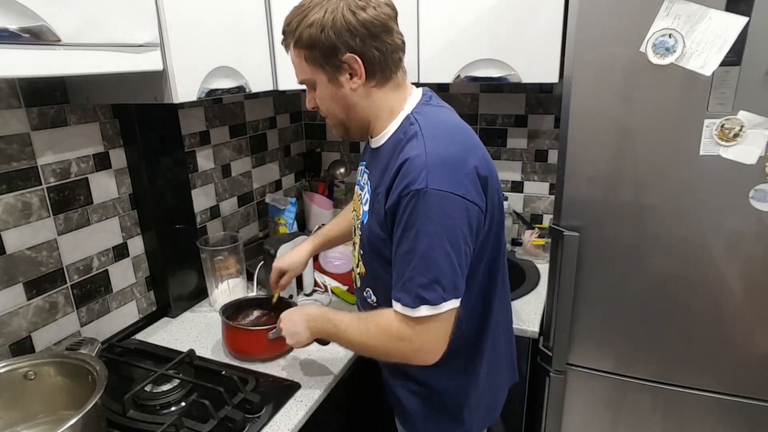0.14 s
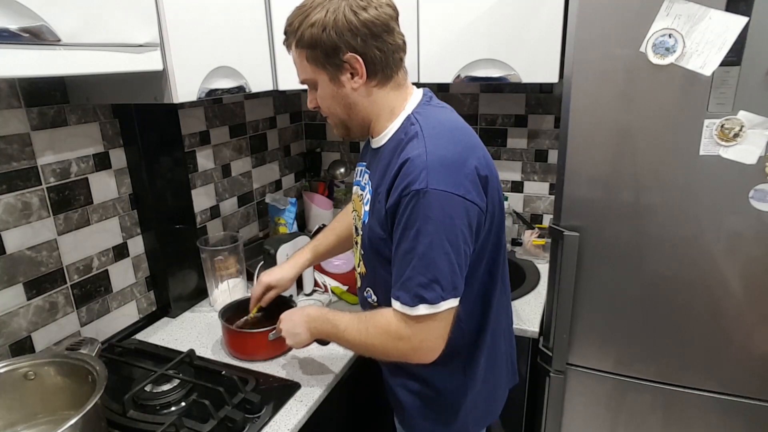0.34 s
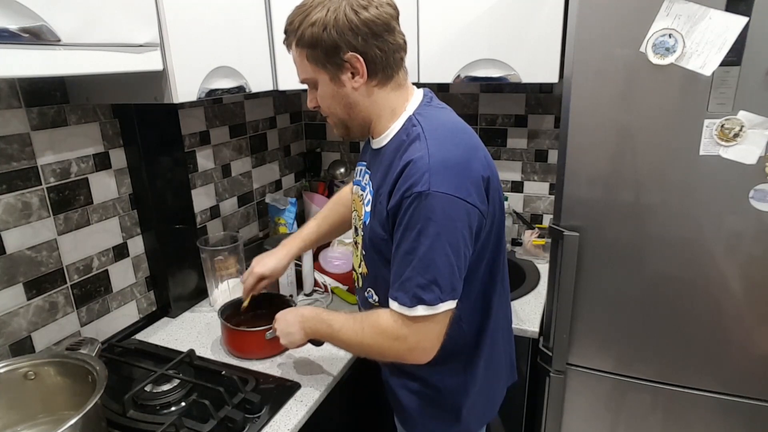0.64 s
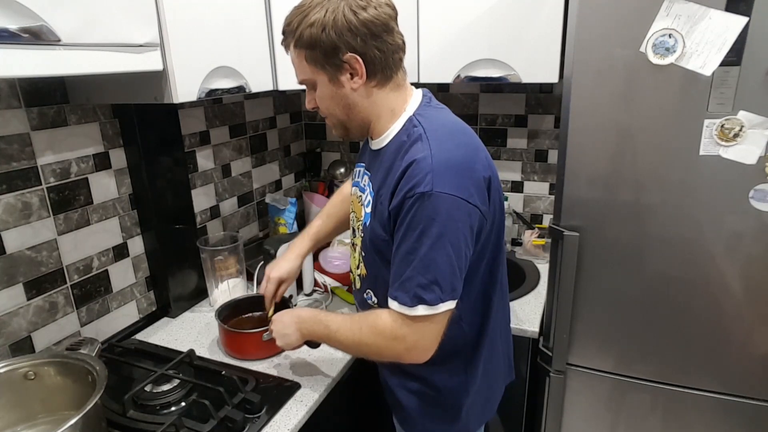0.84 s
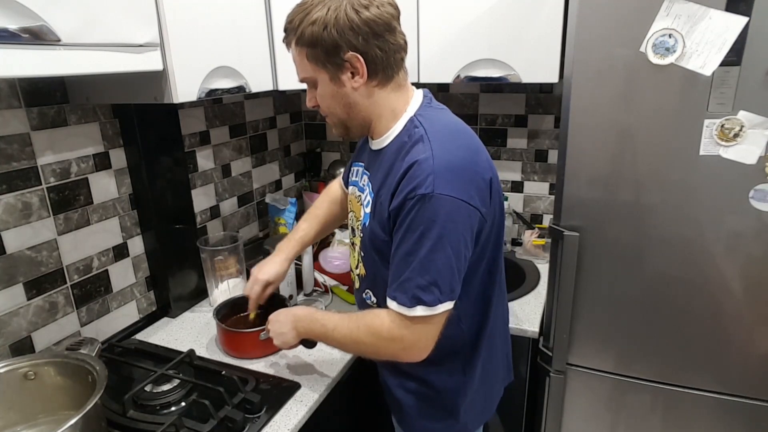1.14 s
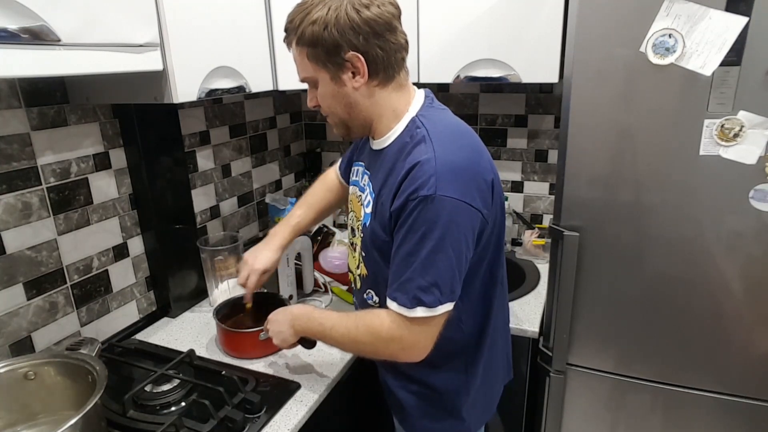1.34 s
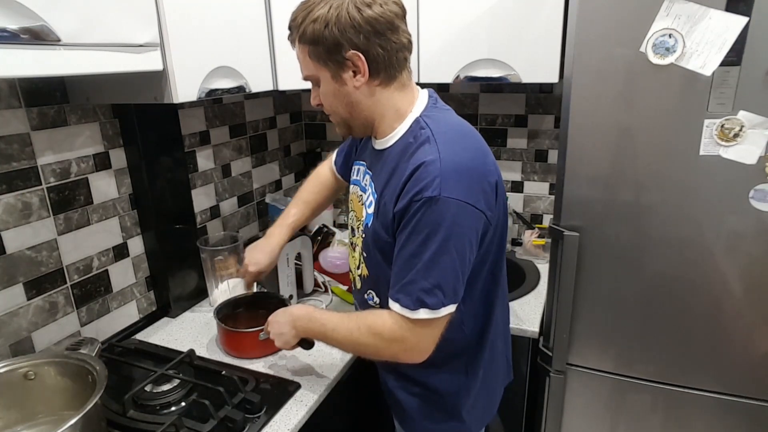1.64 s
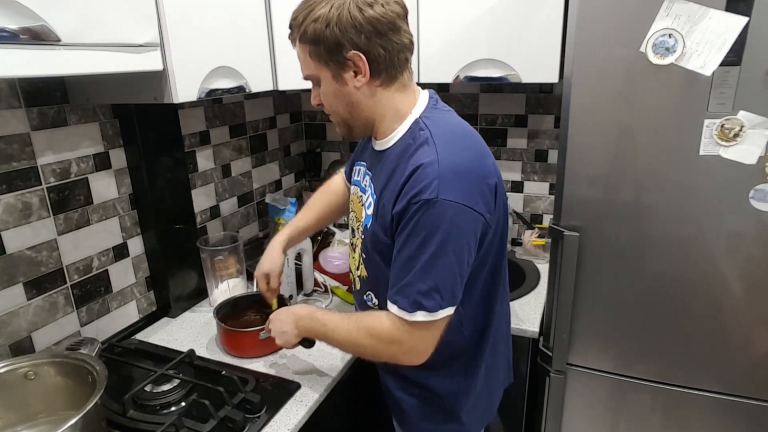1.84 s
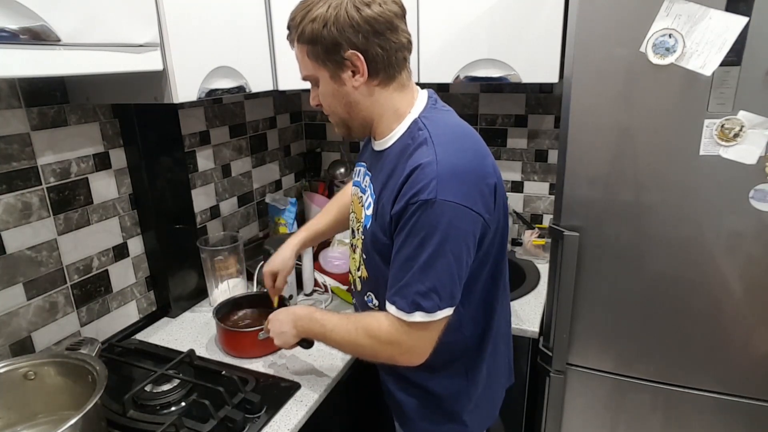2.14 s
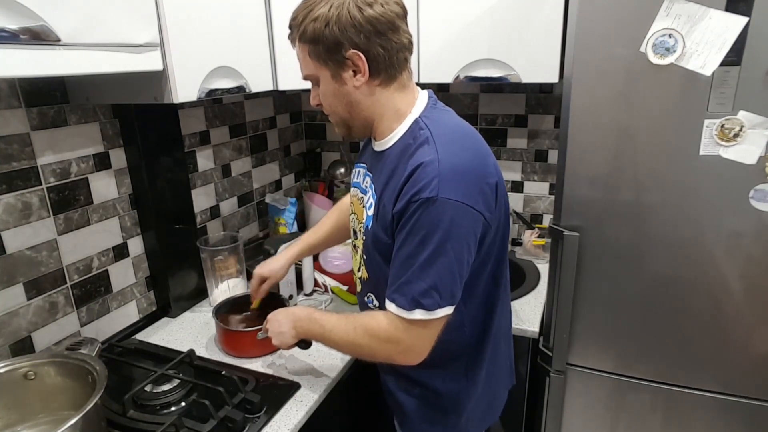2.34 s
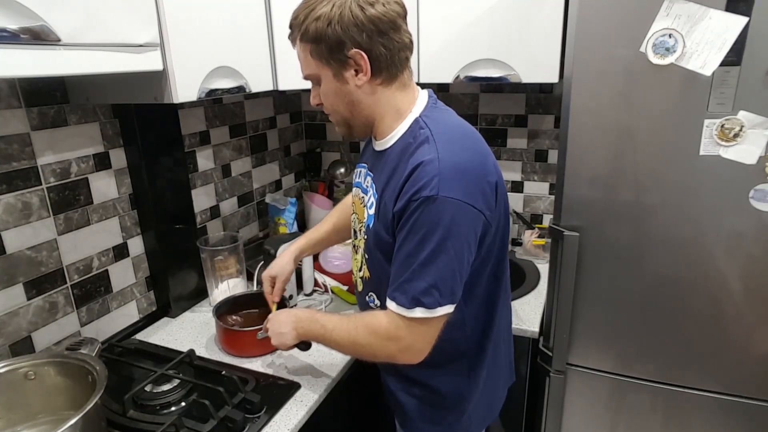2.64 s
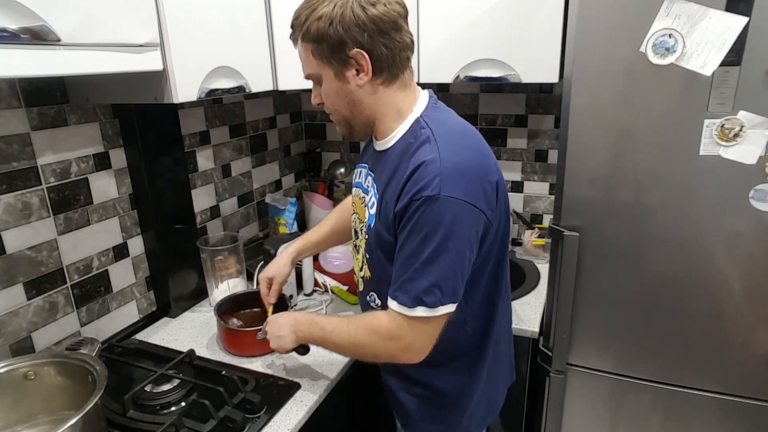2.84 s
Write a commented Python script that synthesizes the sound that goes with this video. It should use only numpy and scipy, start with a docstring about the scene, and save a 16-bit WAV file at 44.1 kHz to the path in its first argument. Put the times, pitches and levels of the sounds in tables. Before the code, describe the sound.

A spatula stirs thick batter in a small pan with dull hollow knocks and wet scraping strokes

```python
"""In a small tiled kitchen, a spatula stirs thick batter in a small pan on the counter.
Strokes are swelling trains of random impulses; knocks are filtered impulse responses with a hollow peak.
Soft, low, dull bumps, like gulps of thick batter, are band-limited; quiet, steady shaped noise lies below.
Each sound but the noise passes through direct sound, echoes, a diffuse tail and modes of pan and counter."""
import sys
import numpy as np
from scipy import signal
from scipy.fft import rfft, irfft
from scipy.io import wavfile

SR = 44100
rng = np.random.default_rng(int(sys.argv[2]) if len(sys.argv) > 2 else 0)


def dump_mix(stems):
    """Bounce the given channels to the path in sys.argv[1] as a 16-bit WAV at rate SR."""
    frames = np.atleast_2d(stems).T  # one column per channel
    limited = np.clip(frames, -1, 1)  # hard clip at full scale
    pcm = np.round(limited * 32767).astype(np.int16)
    wavfile.write(sys.argv[1], SR, pcm)


N = 132300
SIZE = 20480  # samples in each stroke, knock or bump

# Spectrum of the room noise, before its overall level is set: frequency_hz, relative_level_db
AIR_SPECTRUM = [(25, -16), (48, -8.5), (65, -0.5), (82, -10), (100, 3), (125, -3.5), (227, -1.5),
                (330, -14), (480, -2.5), (620, -11), (1000, -18.5), (1500, -21.5), (2000, -21), (3500, -26),
                (5600, -29), (10500, -35.5), (14500, -28.5), (16000, -40)]
AIR_RMS_DB = -57

# Strokes of the blade along the pan: start_s, rise_s, hold_s, fall_s, squelch_db, rasp_db, hiss_db
STROKES = [(-.02, 0.0066, 0.026, 0.032, -26, -48, -57.5), (.05, 0.023, 0.0076, 0.021, -32, -59.5, -72),
           (0.227, 0.043, 0.064, 0.022, -45, -66, -74.5), (0.378, 0.012, 0.022, 0.02, -39, -54, -62.5),
           (.445, 0.02, 0.043, 0.03, -38, -49.5, -56.5), (0.548, 0.006, 0.024, 0.036, -63, -59.5, -67.5),
           (0.818, 0.031, 0.023, 0.071, -35, -50.5, -58.5),
           (1.258, 0.0067, 0.024, 0.026, -38.5, -54.5, -62.5),
           (1.422, 0.0036, 0.0057, 0.0092, -60.5, -65.5, -85),
           (1.592, 0.031, 0.025, 0.099, -46, -55, -64.5), (1.753, 0.011, 0.018, 0.038, -41, -50.5, -57.5),
           (1.763, 0.057, 0.043, .06, -45, -45, -50), (2.004, 0.02, 0.014, 0.015, -37, -49.5, -60),
           (2.195, 0.02, 0.0081, 0.033, -43.5, -43.5, -54.5),
           (2.475, 0.0087, 0.0077, 0.015, -40.5, -58, -64)]
# Filter colour of a stroke, before its bands are balanced: frequency_hz, gain_db
STROKE_COLOUR = [(59, -52), (100, -23), (457, -3.5), (640, -7), (843, -8), (1260, -15), (1620, -12.5),
                 (2180, -18), (3460, -18), (5400, -24), (6950, -23.5), (13400, -43.5), (15500, -49)]
# Edges of the squelch, rasp and hiss bands: frequency_hz
STROKE_EDGES = [150, 1100, 4500, 15000]
CRACKLES_PER_S, CRACKLE_SPREAD_DB = 1100, 4.5

# Spatula knocks, band levels before the common gain:
# start_s, thud_db, knock_db, rap_db, clack_db, tick_db, hollow_pitch_hz, hollowness (0-1)
KNOCKS = [(0.018, -17, -18, -23.5, -46, -75, 620, 0.1), (0.085, -24, -17.5, -25, -33.5, -50, 734, 0.9),
          (0.1843, -29.5, -33, -30.5, -34.5, -54, 1310, 0.4),
          (.349, -26.5, -29.5, -34.5, -40.5, -43.5, 370, 0.14),
          (.640, -49.5, -41, -41.5, -49.5, -60, 770, 0.8), (0.789, -22.5, -21, -32.5, -39.5, -45, 560, .25),
          (1.024, -45, -43, -46.5, -52.5, -63.5, 750, 0.6),
          (1.2165, -23, -21.5, -27.5, -39.5, -54, 462, 0.37), (1.542, -32.5, -28, -37, -42, -51, 680, .5),
          (1.7335, -30, -24.5, -31.5, -43.5, -51.5, 457, 0.1),
          (2.004, -37.5, -28.5, -32, -40.5, -65, 640, 1), (2.156, -29.5, -23, -24.5, -32, -40, 840, 0.8),
          (2.199, -38, -31, -37, -52, -74, 575, 0), (2.303, -25.5, -21.5, -28, -36, -50.5, 610, 0.7),
          (2.455, -34.5, -24, -29.5, -35.5, -43.5, 472, 1), (2.6872, -35, -28, -25, -32, -41, 930, 0.66),
          (2.7589, -35.5, -20.5, -24.5, -25.5, -33, 524, .7),
          (2.8982, -38.5, -33.5, -26.5, -31.5, -48, 985, 1), (2.956, -33.5, -17.5, -23.5, -25, -35, 594, 1)]
# Filter colour of a knock, before its bands are balanced: frequency_hz, gain_db
KNOCK_COLOUR = [(35, -47), (60, -32), (115, -22.5), (155, -13.5), (230, -1.5), (320, -4), (460, 2.5),
                (800, -4), (1100, -13.5), (1500, -11.5), (2100, -16.5), (3300, -13.5), (5700, -30.5),
                (7000, -29.5), (9800, -46), (13500, -47), (15500, -71)]
# Edges of the thud, knock, rap, clack and tick bands: frequency_hz
KNOCK_EDGES = [130, 380, 750, 1500, 4500, 15000]
KNOCK_GAIN_DB, KNOCK_SPAN_S = -5.5, 0.023  # common gain, and the time over which levels count
HOLLOW_PEAK_DB, HOLLOW_OCTAVES = 12, 0.17  # peak at full hollowness, before balancing; half-width
CRACK_DB, CRACK_HZ = -33.5, 10800  # thin crack of the contact, relative to the knock band

# Soft, low, dull bumps: start_s, level_db, pitch_hz
BUMPS = [(.362, -34.5, 310), (1.036, -40.5, 195), (1.116, -49.5, 262)]
BUMP_OCTAVES, BUMP_SPAN_S = 0.6, 0.025

# Low resonances of the counter corner, levels before RING_DB: frequency_hz, relative_level_db, t60_s
CORNER_MODES = [(146.8, -5.5, 0.83), (171.7, -9.5, 0.49), (215.2, -1.5, 0.38), (257.4, -0.5, 0.29),
                (333.9, 0.5, 0.31), (389, -14, 0.51), (439.8, 1.5, 0.3), (476.6, 0, 0.24)]
# Ringing of the batter-damped pan, levels before RING_DB: frequency_hz, relative_level_db, t60_s
PAN_MODES = [(566, -7.5, 0.32), (604.6, -10, 0.21), (668, -3.5, 0.17), (711, -3, 0.23), (808, -9, 0.14),
             (828, -2.5, 0.19), (915, -3.5, 0.37), (1096, 4, 0.28), (1470, 5, 0.18), (1655, -7, 0.19),
             (3040, -6.5, 0.22)]
RING_DB = -52.5

# Decay of the kitchen's tail: frequency_hz, t60_s
ROOM_DECAY = [(150, 0.23), (700, 0.23), (4500, 0.26), (14000, 0.21)]
# Echoes from counter, tiles and ceiling, before a small random delay: delay_s, path_gain_db
ECHOES = [(.0022, -12), (.0063, -23.5), (0.0177, -12)]
DIRECT_DB, EARLY_DB, LATE_DB = -12, -1.5, 1  # relative levels within the path
EARLY_S = 0.023  # time at which the close scatter's envelope has halved
LEFT_LAG_SAMPLES = 4
BASS_LIKENESS, WIDE_HZ = 0.95, 850  # likeness of the microphones (0-1); the room is wide above this
TOP_HZ = 15600


def undb(db):
    """Logarithmic level: convert decibels to an amplitude gain."""
    return 10 ** (np.asarray(db) / 20)


def curve(points, hz):
    """Log-frequency interpolation: read (Hz, value) points along a logarithmic axis."""
    f, v = np.array(points, float).T
    return np.interp(np.log(hz + 1e-6), np.log(f), v)


def bins(size):
    """Discrete spectrum: the frequencies of a real transform."""
    return np.fft.rfftfreq(size, 1 / SR)


def causal(db):
    """Minimum phase: the promptest response with this gain curve, by folding its cepstrum."""
    cepstrum = irfft(db * np.log(10) / 20)
    middle = len(cepstrum) // 2
    cepstrum[1:middle] *= 2
    cepstrum[middle + 1:] = 0
    return np.exp(rfft(cepstrum))


def add(out, start_s, x):
    """Superposition: sum a sound into the scene at its time, trimmed to the scene's ends."""
    i = int(round(start_s * SR))
    x = x[:, max(-i, 0):]
    i = max(i, 0)
    out[:, i:i + x.shape[1]] += x[:, :max(N - i, 0)]


def diffuse(size):
    """Diffuse-field coherence: stereo noise, alike in the bass and unrelated in the treble."""
    mid, side = rfft(rng.standard_normal((2, size)))
    alike = BASS_LIKENESS / (1 + (bins(size) / WIDE_HZ) ** 2)
    shared = mid * np.sqrt((1 + alike) / 2)
    opposed = side * np.sqrt((1 - alike) / 2) * np.array([[1], [-1]])
    return irfft(shared + opposed, size)


def balance(spec, edges, levels_db, span_s):
    """Band energy: steer each band's rms over the first span_s with a smooth gain curve."""
    hz, edges, n = bins(SIZE), np.array(edges, float), int(span_s * SR)
    centres = np.sqrt(edges[1:] * edges[:-1])
    for _ in range(2):
        mono = irfft(spec).mean(0)[:n]
        power = 2 * abs(rfft(mono, SIZE)) ** 2 / (SIZE * n)
        now_db = [10 * np.log10(power[(hz >= a) & (hz < b)].sum() + 1e-18)
                  for a, b in zip(edges, edges[1:])]
        gain_db = curve(np.c_[centres, np.array(levels_db) - now_db], hz)
        spec = spec * causal(gain_db)
    return spec


def air():
    """Stationary random noise: a quiet, steady room sound with a fixed spectrum."""
    x = irfft(rfft(diffuse(N)) * undb(curve(AIR_SPECTRUM, bins(N))), N)
    return x * undb(AIR_RMS_DB) / x.std()


def ringing():
    """Modal superposition: one tap rings pan and counter as exponentially decaying cosines."""
    t = np.arange(SIZE) / SR
    ring = np.zeros(SIZE)
    for f, db, t60 in CORNER_MODES + PAN_MODES:
        decay = np.exp(-np.log(1000) * t / t60)
        ring += undb(RING_DB + db) * np.cos(2 * np.pi * f * t) * decay
    return ring


def kitchen(ring):
    """Linear transmission: path spectrum of direct sound, echoes, close scatter, tail and modes."""
    t, hz = np.arange(SIZE) / SR, bins(SIZE)
    noise, late = rfft(diffuse(SIZE)), 0
    for k, (_, t60) in enumerate(ROOM_DECAY):
        # overlapping band weight: one at this frequency, zero at its neighbours
        band = curve([(f, j == k) for j, (f, _) in enumerate(ROOM_DECAY)], hz)
        late = late + irfft(noise * band) * np.exp(-np.log(1000) * t / t60)
    early = diffuse(SIZE) / (1 + (t / EARLY_S) ** 4)
    scattered = 0
    for db, x in [(LATE_DB, late), (EARLY_DB, early)]:
        energy = (x ** 2).sum(1).mean()
        scattered = scattered + undb(db) * x / np.sqrt(energy)
    h = ring + scattered
    h[:, 0] += undb(DIRECT_DB)
    for s, db in ECHOES:
        # one shared random delay, then one for each microphone
        arrivals = s + rng.uniform(0, 0.0004) + rng.uniform(0, 0.00022, 2)
        h[[0, 1], (arrivals * SR).astype(int)] += undb(db)
    h[0] = np.roll(h[0], LEFT_LAG_SAMPLES)  # the left microphone hears it a few samples later
    return rfft(h)


def strokes(ring):
    """Stick-slip friction: the blade drags through batter in a swell of tiny uneven crackles."""
    out, t = np.zeros((2, N)), np.arange(SIZE) / SR
    colour = causal(curve(STROKE_COLOUR, bins(SIZE)))
    for s, rise, hold, fall, *levels in STROKES:
        push = np.interp(t, np.cumsum([0, rise, hold, fall]), [0, 1, 1, 0])
        slips = rng.random(SIZE) < CRACKLES_PER_S / SR
        signs = rng.choice([-1, 1], SIZE)
        sizes = undb(CRACKLE_SPREAD_DB * np.minimum(rng.exponential(size=SIZE), 4))
        grains = slips * signs * sizes
        spec = rfft(push * grains) * colour * kitchen(ring)
        add(out, s, irfft(balance(spec, STROKE_EDGES, levels, rise + hold + fall)))
    return out


def knocks(ring):
    """Impact excitation: a blow cracks thinly and rings the pan, its hollow pitch set by the batter."""
    out, hz = np.zeros((2, N)), bins(SIZE)
    thin = causal(-10 * np.log10(1 + (CRACK_HZ / (hz + 1000)) ** 8))  # high-pass
    colour_db = curve(KNOCK_COLOUR, hz)
    for s, thud, knock, rap, clack, tick, pitch, hollowness in KNOCKS:
        path = kitchen(ring)
        octaves_off = np.log2((hz + 1) / pitch)
        hollow_db = hollowness * HOLLOW_PEAK_DB / (1 + (octaves_off / HOLLOW_OCTAVES) ** 2)
        levels = [thud, knock, rap, clack, tick]
        blow = balance(path * causal(colour_db + hollow_db), KNOCK_EDGES, levels, KNOCK_SPAN_S)
        crack = irfft(path * thin)
        crack_rms = crack[:, :int(KNOCK_SPAN_S * SR)].std()
        add(out, s, irfft(blow) + crack * undb(knock + CRACK_DB) / crack_rms)
    return out * undb(KNOCK_GAIN_DB)


def bumps(ring):
    """Band-limited impulse response: soft, low, dull bumps, perhaps gulps of the thick batter."""
    out, hz = np.zeros((2, N)), bins(SIZE)
    for s, db, pitch in BUMPS:
        octaves_off = np.log2((hz + 1) / pitch)
        dull = causal(-20 * np.log10(1 + (octaves_off / BUMP_OCTAVES) ** 4))
        x = irfft(kitchen(ring) * dull)
        add(out, s, x * undb(db) / x[:, :int(BUMP_SPAN_S * SR)].std())
    return out


def scene():
    """Superposition: strokes, knocks and bumps sum over the room noise."""
    ring = ringing()
    return air() + strokes(ring) + knocks(ring) + bumps(ring)


def record(dry):
    """Low-pass filtering: the recorder cuts the top with a steep elliptic filter."""
    return signal.sosfilt(signal.ellip(8, 0.2, 70, TOP_HZ, fs=SR, output="sos"), dry)


dry = scene()
out = record(dry)
dump_mix(out)
```